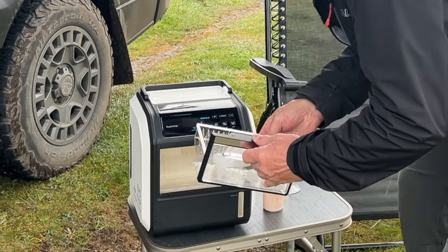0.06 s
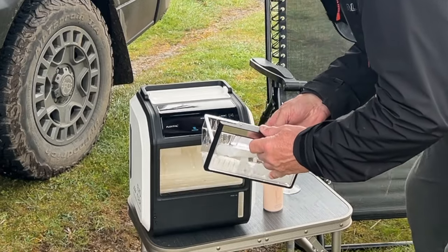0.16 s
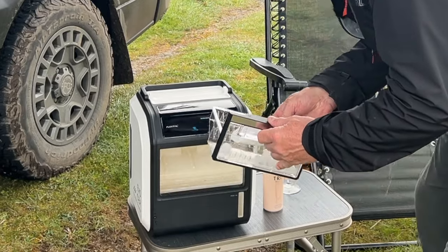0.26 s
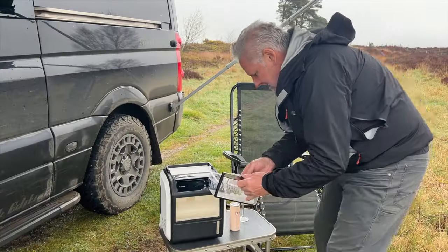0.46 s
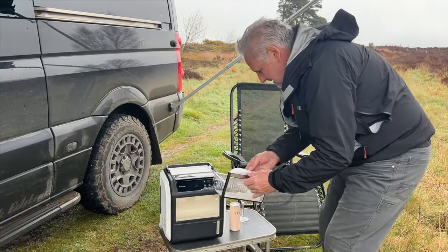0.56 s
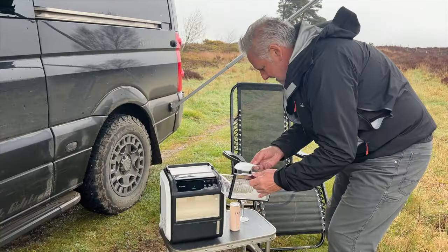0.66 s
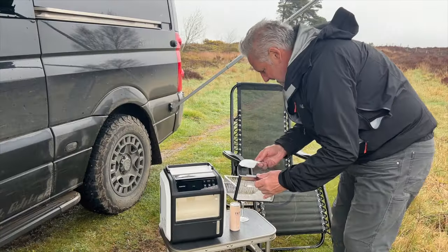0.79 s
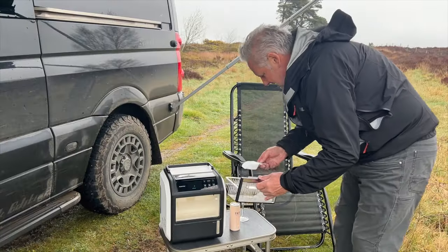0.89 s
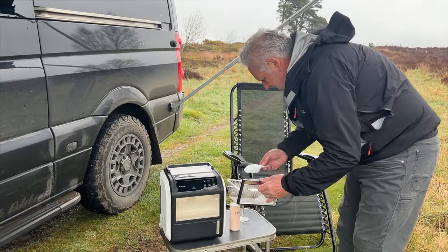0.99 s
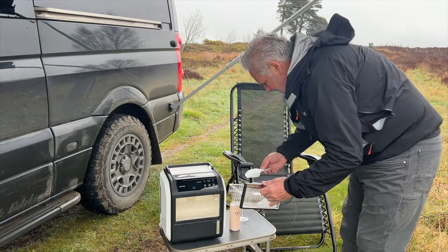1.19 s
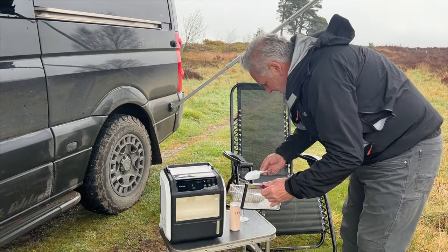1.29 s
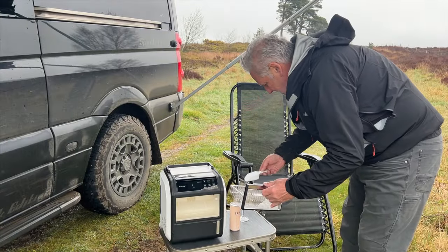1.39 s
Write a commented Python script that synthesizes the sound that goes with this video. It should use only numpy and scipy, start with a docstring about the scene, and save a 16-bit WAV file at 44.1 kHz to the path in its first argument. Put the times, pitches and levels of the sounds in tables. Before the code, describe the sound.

Ice knocks hollowly in a handheld plastic tray, then a scoop clacks sharply against it and a few cubes settle. Outdoors, wind rumbles lightly on the microphone over a faint machine hum.

```python
"""Dull, hollow knocks of ice on a clear plastic tray, handled outdoors while wind rumbles on the microphone.
A scoop pulls free with sharp clacks that set tray and scoop ringing, then a few last cubes settle.
The scoop's edge ticks, and hands and sleeves rub softly over the plastic.
Underneath, the ice maker nearby hums and whines faintly in a bed of open air."""
import sys
import numpy as np
from scipy import signal
from scipy.io import wavfile
from scipy.ndimage import uniform_filter1d

SR = 44100
rng = np.random.default_rng(int(sys.argv[2]) if len(sys.argv) > 2 else 0)


def unload_wav(signal):
    """Save mono or channel-first audio to the path in sys.argv[1] as 16-bit WAV at rate SR, clipped to [-1, 1]."""
    wavfile.write(
        sys.argv[1],
        SR,
        np.round(np.clip(np.atleast_2d(signal).T, -1, 1) * 32767).astype(np.int16),
    )


N = 63945
TIME = np.arange(N) / SR
AGE = np.arange(SR // 4) / SR   # seconds since a strike
EDGES_HZ = 20 * 2 ** (np.arange(40) / 4)   # quarter-octave bands
CENTRES_HZ = np.sqrt(EDGES_HZ[1:] * EDGES_HZ[:-1])
BANK = [signal.butter(2, pair, "band", fs=SR, output="sos") for pair in zip(EDGES_HZ, EDGES_HZ[1:])]
TREBLE_HZ, TOP_HZ = 1900, 7000   # crossovers between a hit's body, treble and top


def from_db(db):
    """Decibels to gain."""
    return 10 ** (np.asarray(db) / 20)


def rms_one(x):
    """Scale to rms 1."""
    return x / np.sqrt(np.mean(x ** 2) + 1e-20)


def fade(t60_s):
    """Exponential decay after a strike."""
    return np.exp(-np.log(1000) * AGE / max(t60_s, 1e-3))


def fader(points):
    """Gain curve through (time_s, level_db) points."""
    return from_db(np.interp(TIME, *np.transpose(points)))


def add(out, start_s, sound):
    """Mix a sound in at its cue."""
    start = max(int(start_s * SR), 0)
    out[start:start + len(sound)] += sound[:N - start]


def band_gains(eq):
    """Each band's share of an EQ curve of relative power per hertz; total power 1."""
    hz, db = np.transpose(eq)
    density_db = np.interp(np.log(CENTRES_HZ), np.log(hz), db, left=-200, right=-200)
    gains = from_db(density_db) * np.sqrt(CENTRES_HZ)
    return gains / np.linalg.norm(gains)


def noise(eq):
    """Steady noise shaped by an EQ curve, rms about 1."""
    return sum(gain * rms_one(signal.sosfilt(sos, rng.standard_normal(N + SR // 2))[-N:])
               for gain, sos in zip(band_gains(eq), BANK) if gain > 1e-6)


def clatter(gains, t60_s, tail_t60_s, tail_db, damping):
    """Crowded plastic modes: a crack and a weaker tail. Decays are set at 1 kHz and shorten with pitch."""
    out = np.zeros(len(AGE))
    for gain, hz, sos in zip(gains, CENTRES_HZ, BANK):
        grit = np.sign(rng.standard_normal(len(AGE)))
        if gain > 1e-7:
            stretch = (hz / 1000) ** -damping
            envelope = fade(t60_s * stretch) + from_db(tail_db) * fade(tail_t60_s * stretch)
            band = rms_one(signal.sosfilt(sos, grit * envelope))
            out += gain * band * np.sqrt(np.mean(envelope ** 2))
    return out


def ringing(modes, level_db, trim_db=-5, grip_t60_s=.085):
    """Struck modes, balanced a little differently at every blow; the gripping hands stop any long ring."""
    out = np.zeros(len(AGE))
    for k, (hz, mode_db, free_t60_s) in enumerate(modes):
        gain = from_db(level_db + mode_db + trim_db + rng.normal(0, 1))
        out += (-1) ** k * gain * fade(min(free_t60_s, grip_t60_s)) * np.sin(2 * np.pi * hz * AGE)
    return out


def bloom(hz, swell_s):
    """A driven resonance swells into a few cycles of its note and dies."""
    return AGE / swell_s * np.exp(1 - AGE / swell_s) * np.sin(2 * np.pi * hz * AGE)


# Tone of the outdoor bed: frequency_hz, relative_db
AIR_EQ = [(110, -32), (180, -12.5), (217, -7), (239, -19.5), (334, 0), (374, -5), (396, -17.5), (506, -11),
          (555, -30), (764, -19.5), (1150, -17.5), (1620, -27), (3700, -30), (7990, -39.5), (10400, -39),
          (11200, -50.5), (16000, -62.5)]


def open_air(level_db=-62.5):
    """A quiet, steady ambience, fullest in the low mids."""
    return from_db(level_db) * noise(AIR_EQ)


# The machine's low hum and high whine: pitch_hz, width_hz, level_db
MACHINE_TONES = [(212.2, 2.5, -67), (328.6, 29, -66), (366.7, 11.3, -70), (10800, 77, -90.5),
                 (9860, 69, -84.5)]


def ice_maker():
    """Faint tones that wander a little in pitch."""
    out = np.zeros(N)
    for hz, width_hz, level_db in MACHINE_TONES:
        jitter = uniform_filter1d(rng.standard_normal(N), size=100)
        phase_drift = np.cumsum(jitter) * np.sqrt(2 * np.pi * width_hz / SR)
        out += from_db(level_db) * np.sqrt(2) * np.sin(2 * np.pi * hz * TIME + phase_drift)
    return out


# Rise and fall of the gusts: time_s, level_db
GUST_FADER = [(0.0, -63.5), (0.116, -65), (0.192, -39.5), (0.214, -46), (0.416, -56.5), (0.44, -41),
              (0.476, -51.5), (0.5, -43), (0.56, -42.5), (0.604, -70), (0.642, -59.5), (0.674, -44),
              (0.734, -55.5), (0.802, -48.5), (0.872, -59.5), (0.996, -42), (1.046, -51.5), (1.074, -39.5),
              (1.19, -38.5), (1.206, -46), (1.226, -42.5), (1.316, -48), (1.36, -62.5), (1.45, -67)]
# Bass-heavy tone of the buffeting: frequency_hz, relative_db
WIND_EQ = [(20, -8), (35, -0.5), (62, 0.5), (95, -6), (130, -13), (180, -26.5), (300, -32), (450, -31.5),
           (700, -55), (1000, -60.5)]


def wind(trim_db=-.5):
    """Gusts buffet the microphone with a low rumble."""
    rumble = noise(WIND_EQ)
    even_rumble = rumble / np.sqrt(uniform_filter1d(rumble ** 2, size=3000))
    return from_db(trim_db) * fader(GUST_FADER) * even_rumble


# Swells of handling noise: time_s, level_db
RUB_FADER = [(0, -81), (0.18, -82.5), (0.222, -70), (0.285, -49.5), (0.34, -78), (0.41, -82), (0.49, -76),
             (0.55, -68), (0.6, -77), (0.68, -70.5), (0.76, -82.5), (1.45, -100)]
# Airy tone of the friction: frequency_hz, relative_db
RUB_EQ = [(1500, -3), (3000, 3), (8000, -0.5), (15000, -5.5)]


def rubbing(grain_db=1.5, grains_per_s=400):
    """Hands and sleeves slide over the plastic with a fine, uneven hiss."""
    grain = np.interp(TIME * grains_per_s, np.arange(N), rng.standard_normal(N))
    return fader(RUB_FADER) * from_db(grain_db * grain) * noise(RUB_EQ)


# Small, dry touches of the scoop's edge: start_s, level_db
TICK_CUES = [(0.265, -31), (0.271, -7.5), (0.37, -46), (0.55, -74), (0.6655, -46), (0.684, -47.5)]
# Thin, bright tone of a tick: frequency_hz, relative_db
TICK_EQ = [(700, -14.5), (1350, -7.5), (2000, -19), (3000, -7), (3600, -9.5), (5800, 0.5), (7400, -7),
           (9000, -23), (11000, -25.5), (16000, -41.5)]


def scoop_ticks(trim_db=-10):
    """Glancing contacts, too light to set the tray ringing."""
    out = np.zeros(N)
    for start_s, level_db in TICK_CUES:
        tick = clatter(band_gains(TICK_EQ), t60_s=.004, tail_t60_s=.0529, tail_db=-19.5, damping=.05)
        add(out, start_s, from_db(level_db + trim_db) * tick)
    return out


# Resonances of the tray: pitch_hz, relative_db, free_t60_s
TRAY_PARTIALS = [(772, -12.5, 0.18), (822, -25, 0.099), (924, -14.5, .075), (957, -17, 0.26),
                 (984.7, -13, 0.11), (1215, -24, 0.045), (1160, -26.5, 0.02), (1346, -9, 0.12),
                 (1518, -19, .06)]


def tray_ring(level_db):
    """The struck tray rings briefly in the midrange."""
    return ringing(TRAY_PARTIALS, level_db)


# Bumps on the tray walls: start_s, body_db, treble_db, wall_pitch_hz, wall_db
KNOCK_CUES = [(0.012, -72, -44, 1870, -57), (0.066, -36, -30, 1370, -32.5),
              (0.0778, -30.5, -22.5, 1010, -29.5), (0.0818, -30.5, -24, 1315, -25),
              (0.0890, -34, -37, 970, -47), (0.0983, -49, -30, 1020, -30.5), (0.102, -44, -21.5, 1220, -28),
              (0.1042, -31.5, -30.5, 1045, -24.5), (0.1090, -42, -25.5, 1230, -30.5),
              (0.1148, -47, -27, 940, -28), (0.1195, -65, -49.5, 1270, -33.5),
              (0.1255, -43, -76, 900, -33.5), (0.134, -35, -33.5, 1170, -32.5),
              (0.142, -42.5, -59, 1030, -34.5), (0.1632, -38, -46, 910, -36), (0.186, -35, -33.5, 900, -28),
              (0.193, -37, -34.5, 838, -31), (0.2015, -28.5, -30, 810, -21),
              (0.2075, -31.5, -30, 785.5, -34), (0.212, -63, -27, 920, -33.5),
              (0.371, -47, -45.5, 1350, -51.5), (0.472, -46.5, -44.5, 1134, -53.5),
              (0.513, -54, -53, 880, -53), (0.551, -50.5, -36, 980, -80), (0.5920, -47.5, -40.5, 803, -33),
              (0.636, -47.5, -41.5, 930, -43.5), (0.701, -52.5, -45, 1150, -42.5),
              (0.7055, -38, -42.5, 860, -32.5), (0.715, -41, -56, 1030, -45),
              (0.7200, -59, -43.5, 1100, -46)]
# Dull, boxy tone of a knock: frequency_hz, relative_db
KNOCK_EQ = [(260, -49.5), (450, -12.5), (586, -34), (720, -2.5), (1020, 5), (1100, -10), (1350, -1.5),
            (1790, -25.5), (1950, -41), (2900, -22.5), (3720, -33), (4850, -31.5), (5530, -38),
            (6790, -39.5), (15000, -66)]


def ice_knocks():
    """Ice and scoop bump the walls: hollow knocks, each with the note of the spot hit and a brief ring."""
    impacts, walls = np.zeros(N), np.zeros(N)
    for start_s, body_db, treble_db, wall_pitch_hz, wall_db in KNOCK_CUES:
        gains = band_gains(KNOCK_EQ) * from_db(np.where(CENTRES_HZ < TREBLE_HZ, body_db - 4, treble_db))
        add(impacts, start_s, clatter(gains, t60_s=.023, tail_t60_s=.1, tail_db=-6, damping=.12))
        note = from_db(wall_db - .5) * bloom(wall_pitch_hz, swell_s=.0015)
        add(walls, start_s, note + tray_ring(wall_db - 21))
    low_cut = signal.butter(4, 626, "high", fs=SR, output="sos")   # small walls radiate little bass
    return impacts + signal.sosfilt(low_cut, walls)


# Hard plastic hits: start_s, body_db, treble_db, top_db, tray_db, scoop_db, flex_db, high_cut_hz
CLACK_CUES = [(0.2301, -11.5, -10.5, -6, -5, -8.5, -13.5, 15300),
              (0.2927, -15, -13.5, -8.5, -9.5, -13, -24, 15000),
              (0.4421, -30, -27, -21.5, -26, -23.5, -35, 6200)]
# Tone of the crack: frequency_hz, relative_db
CLACK_EQ = [(280, -18), (350, -11.5), (430, -31.5), (620, -25.5), (750, 1), (1000, -3), (1400, -3.5),
            (1700, -22.5), (2200, -8.5), (2800, -11), (3100, -4), (3750, -15.5), (4500, -6), (6000, -12.5),
            (7300, -21), (8200, -24.5), (10800, -31.5), (11700, -22.5), (12600, -35), (16000, -40.5)]
# Bright resonances of the scoop: pitch_hz, relative_db, free_t60_s
SCOOP_PARTIALS = [(2196, -21, .035), (2420, -22, .04), (2655, -22, .07), (2975, -14, .05),
                  (3055, -18, .045), (3208, -12, .045), (3470, -16, .055), (4115, -14, .045),
                  (4340, -13, .038), (4400, -15, .04), (4560, -17, .045), (4950, -17, .042),
                  (5240, -20, .03), (5750, -15, .028), (11650, -20, .02)]


def scoop_clacks(crack_trim_db=-9.5):
    """The scoop snaps against the tray and both ring; the harder the contact, the brighter the clack."""
    out = np.zeros(N)
    for start_s, body_db, treble_db, top_db, tray_db, scoop_db, flex_db, high_cut_hz in CLACK_CUES:
        band_db = np.select([CENTRES_HZ < TREBLE_HZ, CENTRES_HZ < TOP_HZ], [body_db, treble_db], top_db)
        gains = band_gains(CLACK_EQ) * from_db(band_db + crack_trim_db)
        crack = clatter(gains, t60_s=.013, tail_t60_s=.11, tail_db=-3, damping=.24)
        snap = from_db(scoop_db + 2) * fade(t60_s=.002) * np.sin(2 * np.pi * 4300 * AGE)
        ring = tray_ring(tray_db) + ringing(SCOOP_PARTIALS, scoop_db)
        flex = from_db(flex_db) * bloom(hz=848.4, swell_s=.0016)
        hollow = from_db(tray_db - 23) * bloom(hz=498, swell_s=.0055)
        hit = np.zeros(N)
        add(hit, start_s, snap + crack + ring)
        add(hit, start_s + .0026, flex)   # the wall flexes back and knocks once more
        add(hit, start_s + .005, hollow)   # the air in the tray answers late
        contact_band = signal.butter(2, [300, high_cut_hz], "band", fs=SR, output="sos")
        out += signal.sosfilt(contact_band, hit)
    return out


def scene():
    """Mono mix: the tray in the hands up front, over wind, the machine and open air."""
    handling = scoop_clacks() + scoop_ticks() + ice_knocks() + rubbing()
    return (handling + wind() + ice_maker() + open_air())[None]


def record(dry):
    """A steep high cut at 16 kHz."""
    return signal.sosfilt(signal.ellip(10, .1, 80, 16000, fs=SR, output="sos"), dry)


dry = scene()
out = record(dry)
unload_wav(out)
```